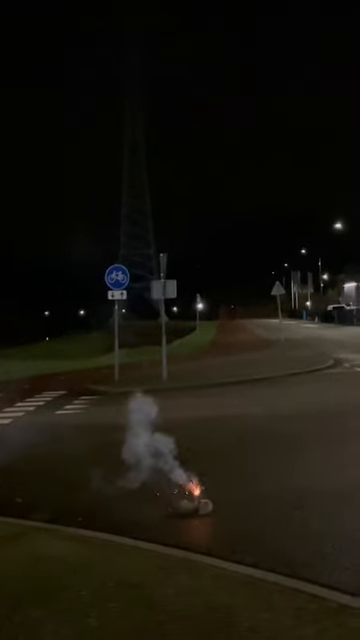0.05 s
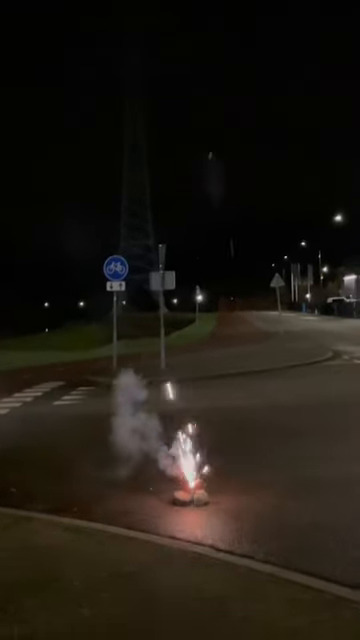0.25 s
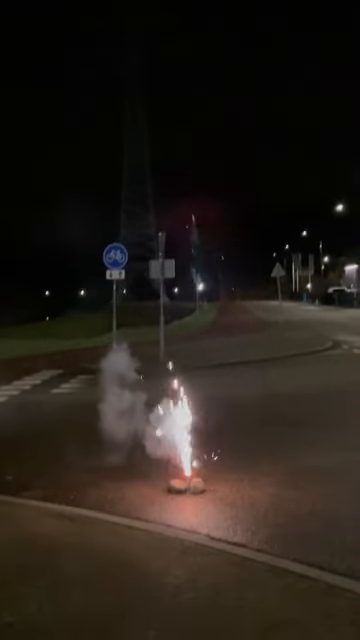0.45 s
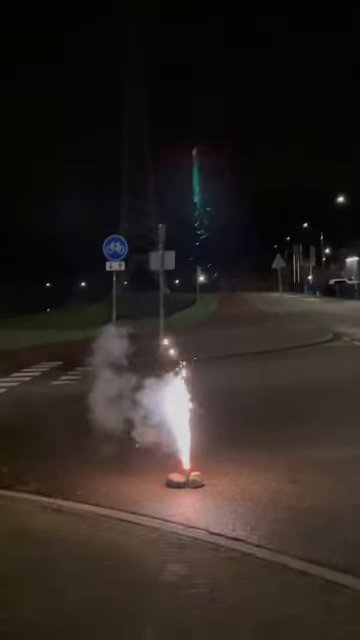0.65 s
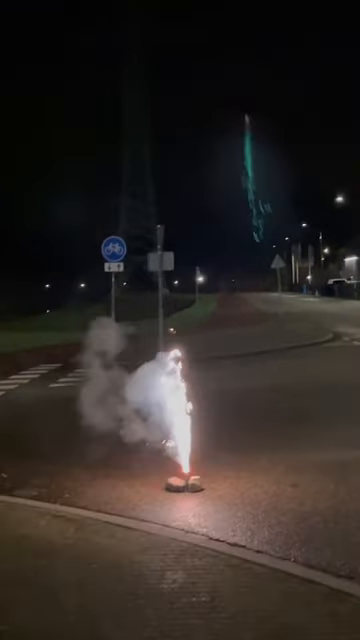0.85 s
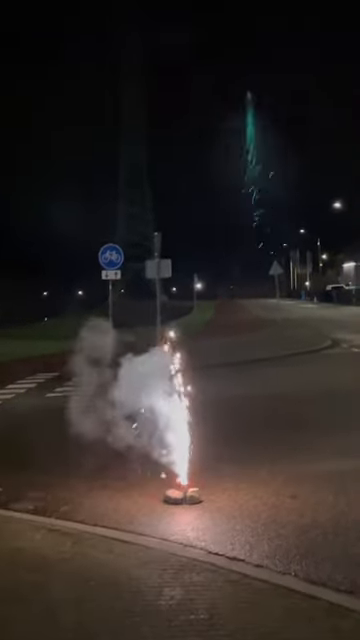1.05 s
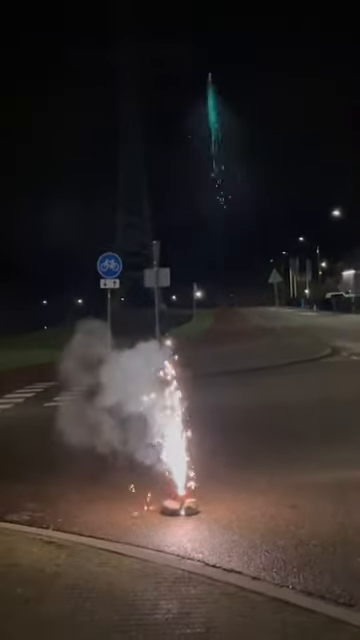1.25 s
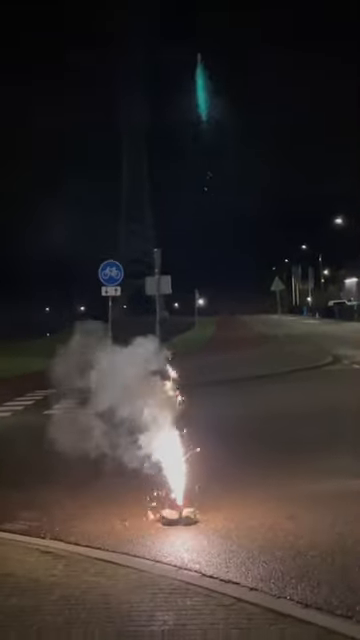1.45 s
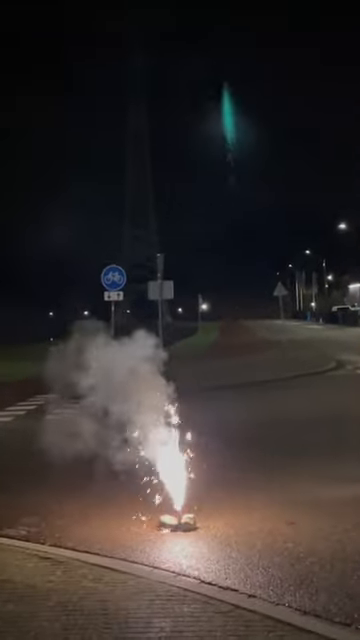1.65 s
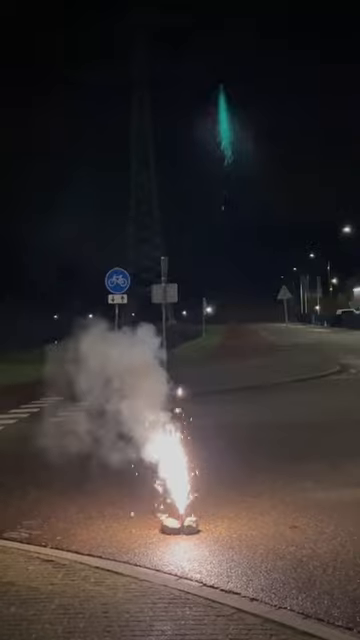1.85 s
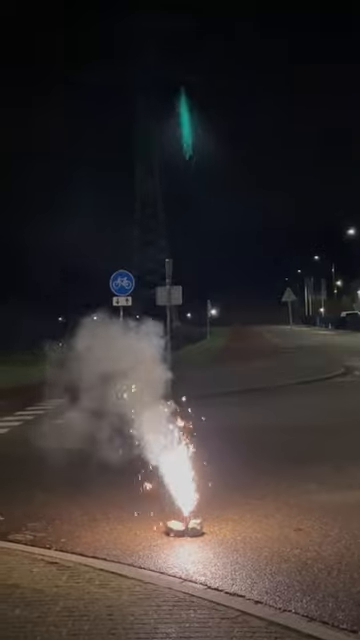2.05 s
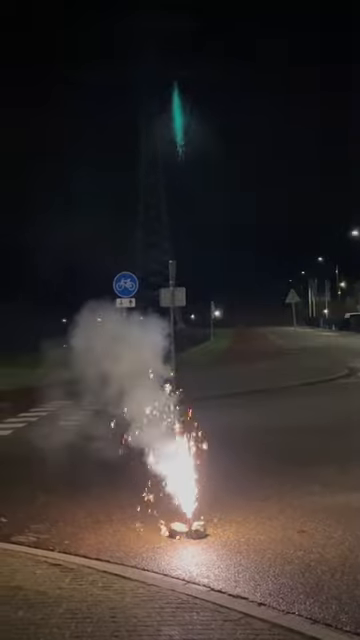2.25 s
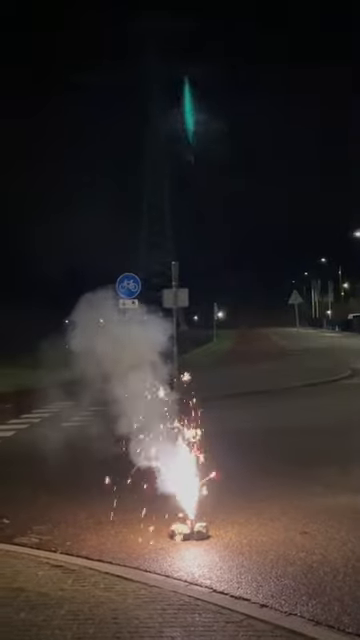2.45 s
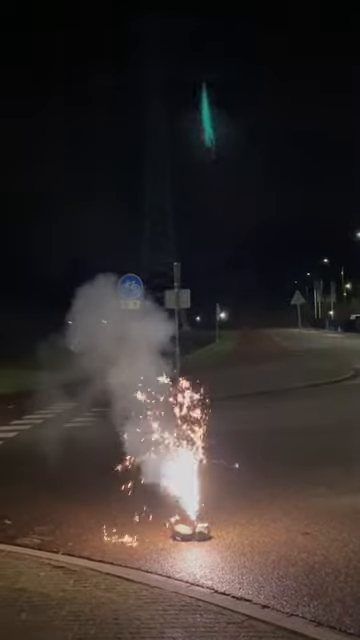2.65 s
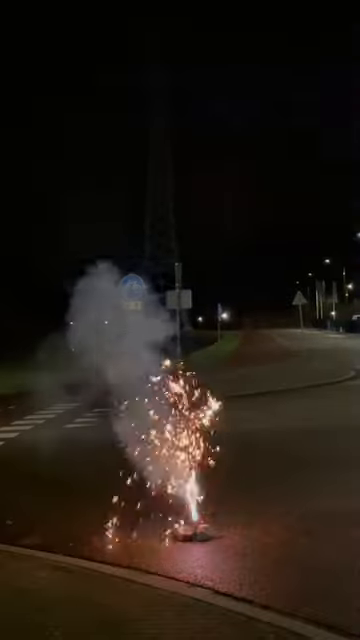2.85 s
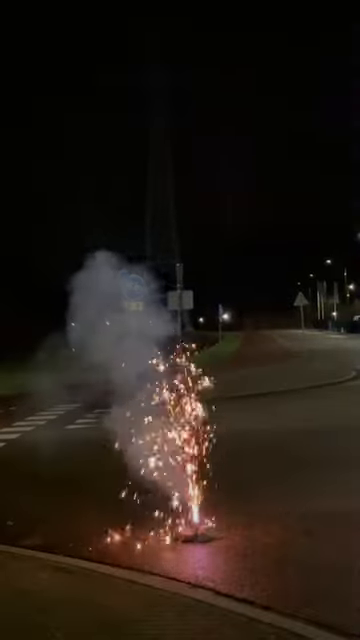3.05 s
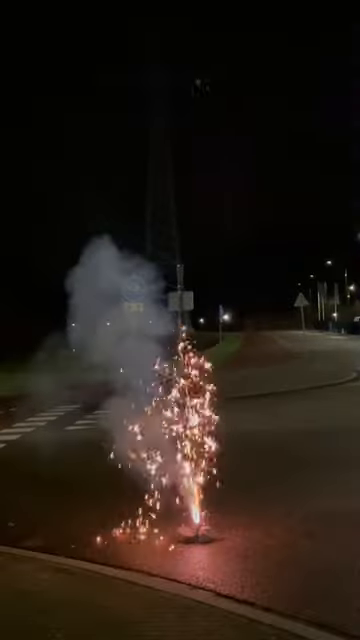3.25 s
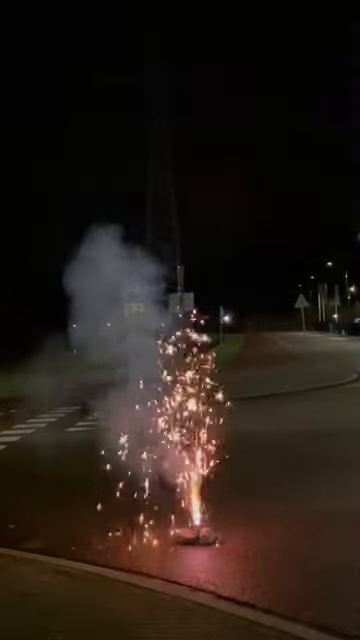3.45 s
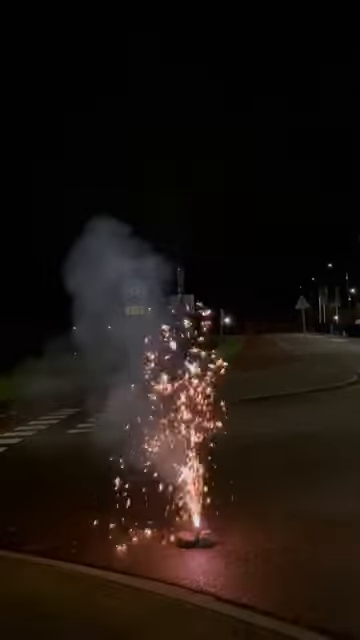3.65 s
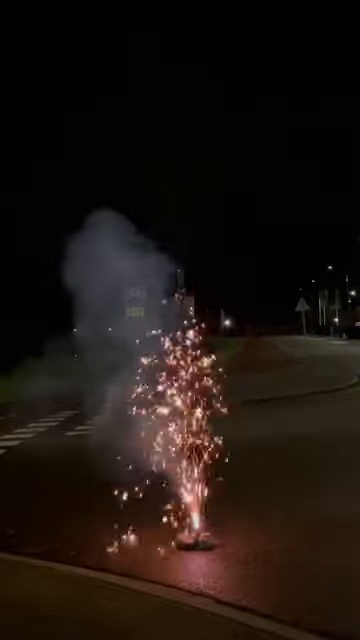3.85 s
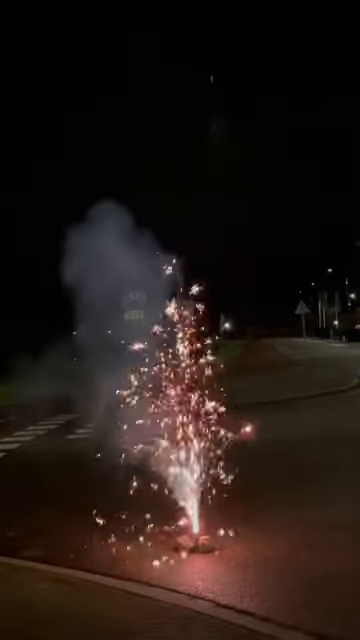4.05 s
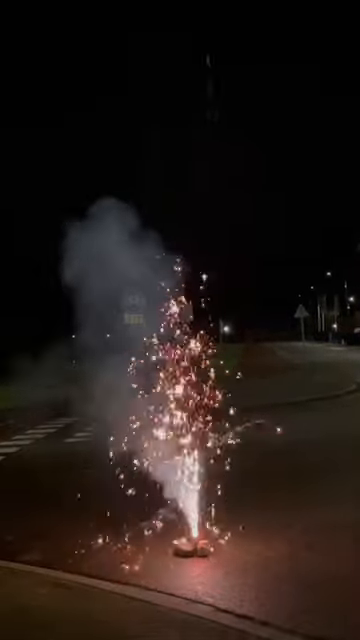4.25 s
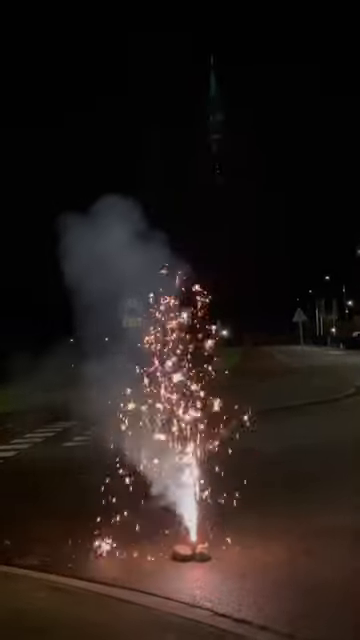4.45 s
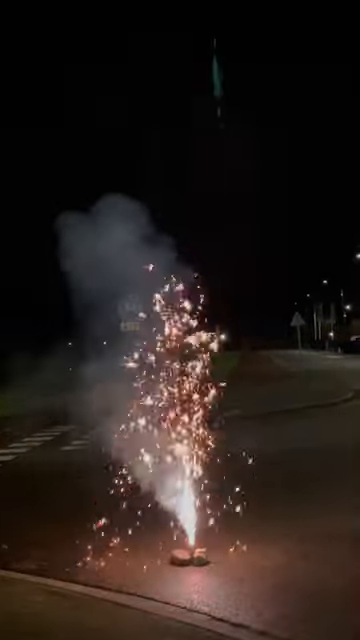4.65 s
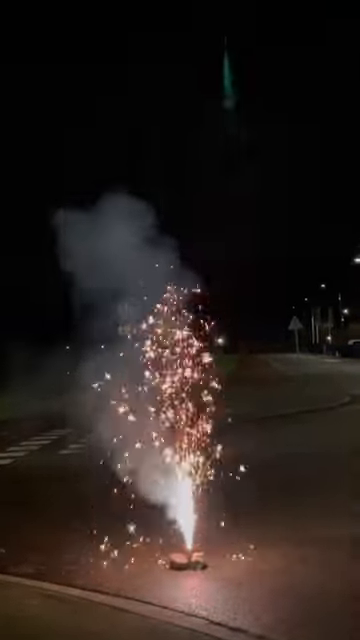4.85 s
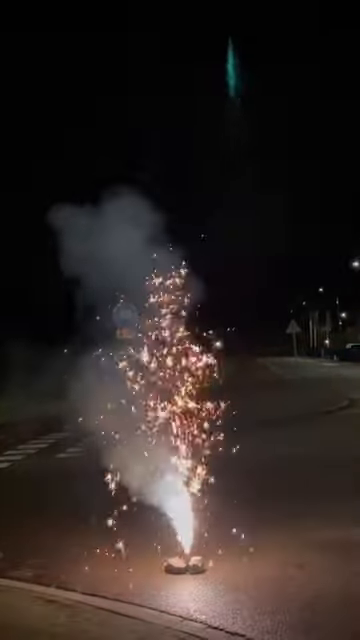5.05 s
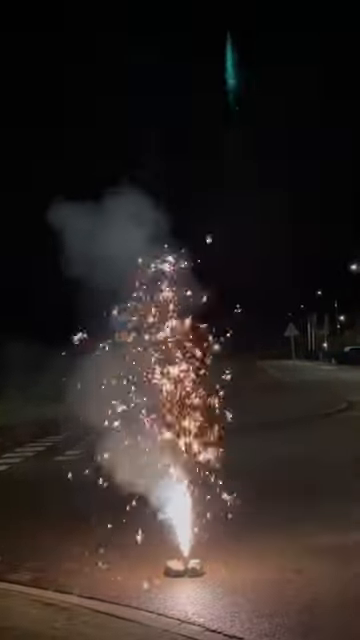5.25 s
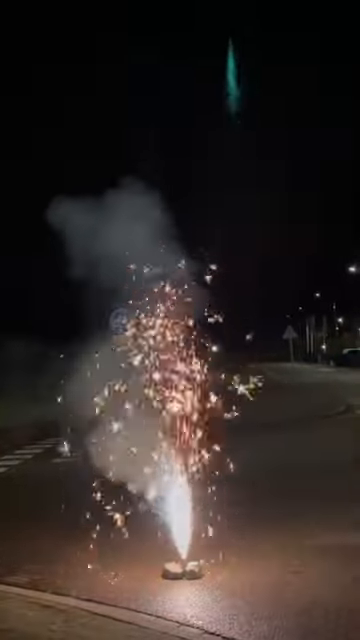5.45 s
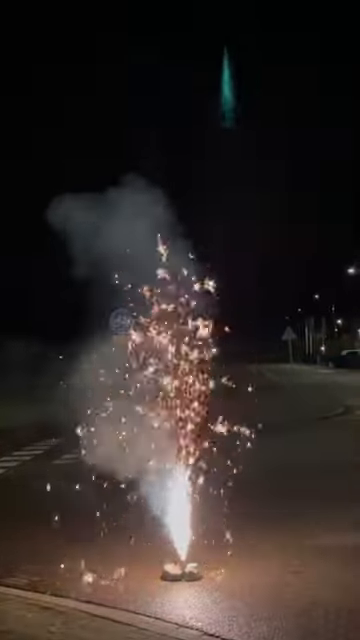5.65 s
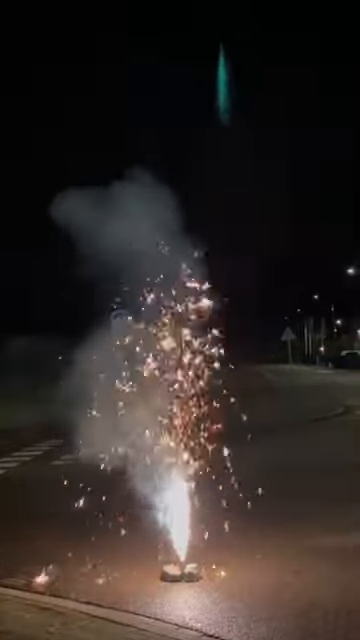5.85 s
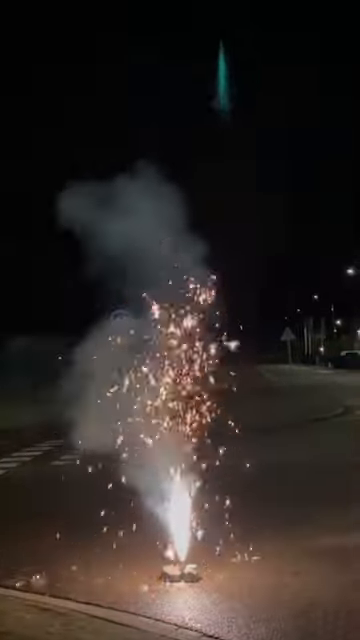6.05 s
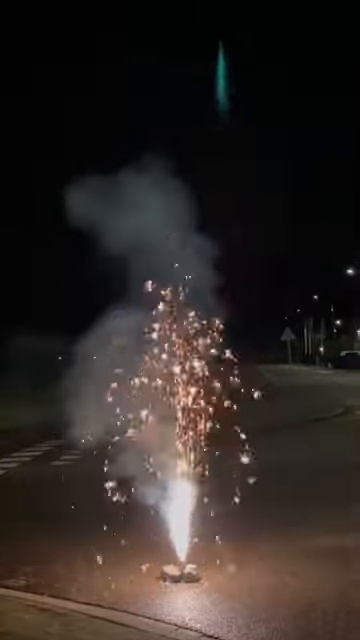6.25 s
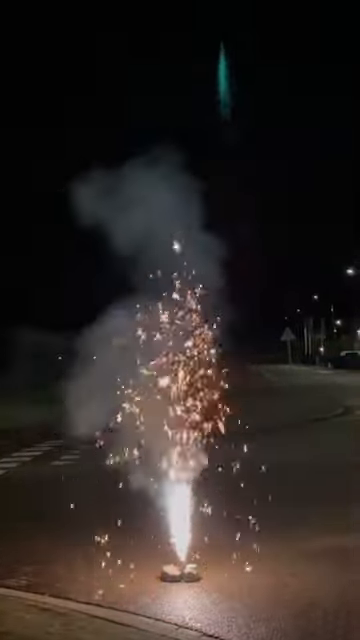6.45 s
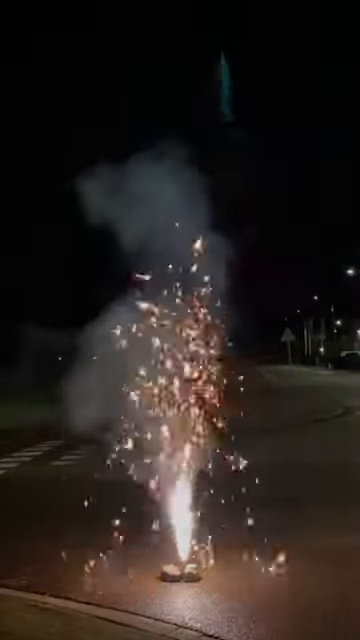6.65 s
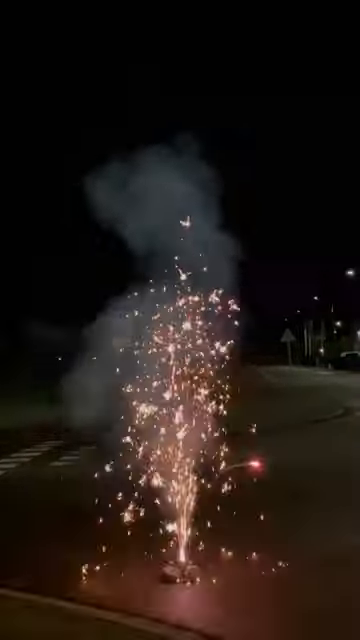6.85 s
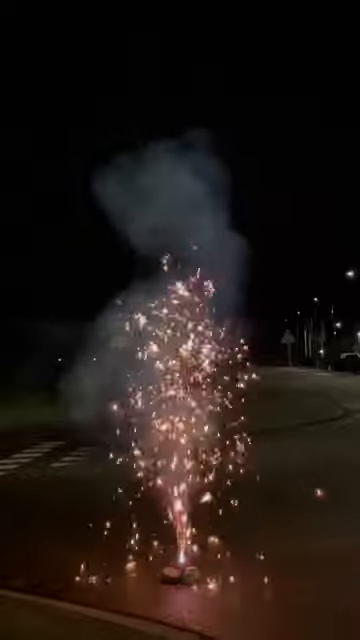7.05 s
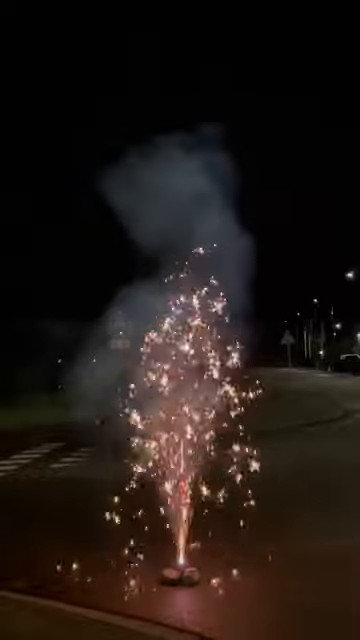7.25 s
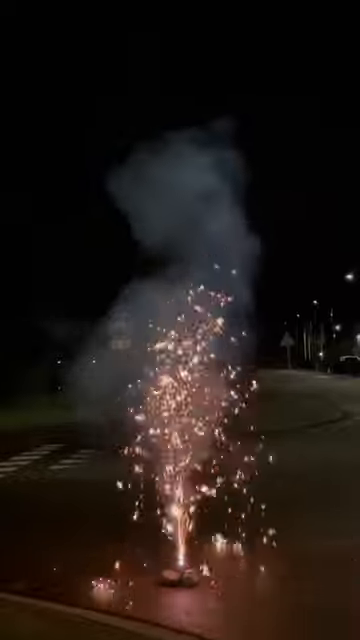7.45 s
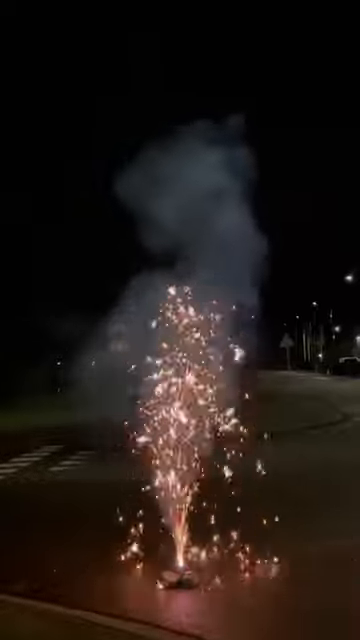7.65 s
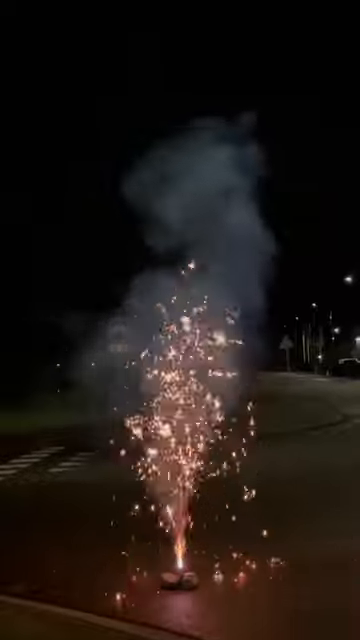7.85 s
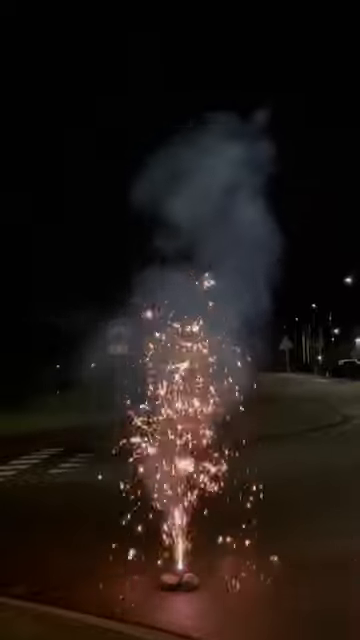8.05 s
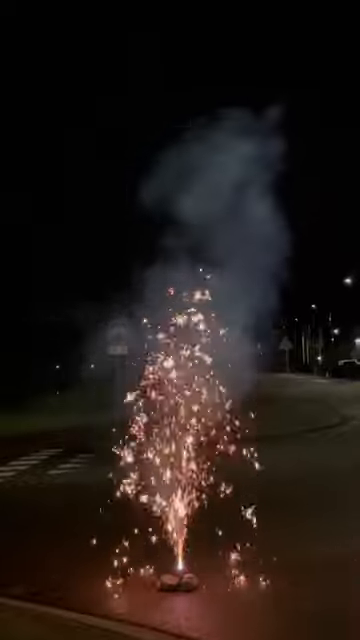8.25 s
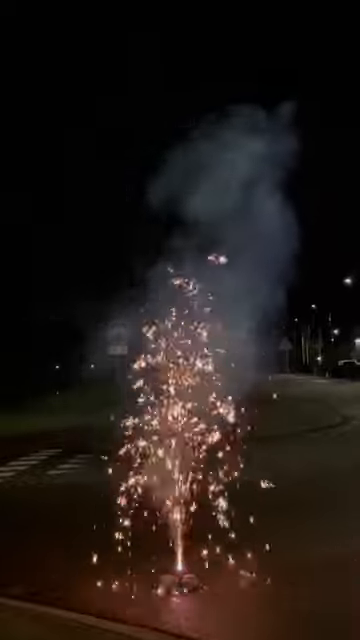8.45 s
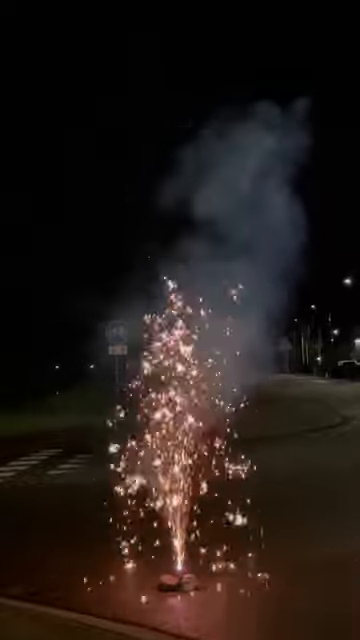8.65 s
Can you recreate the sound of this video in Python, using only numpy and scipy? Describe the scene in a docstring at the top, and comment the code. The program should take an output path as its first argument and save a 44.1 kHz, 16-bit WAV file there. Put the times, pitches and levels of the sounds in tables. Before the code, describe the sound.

A fountain firework hisses on a night street and gives two loud, shrill falling whistles, with distant bangs thumping behind.

```python
"""A fountain firework lights with a soft whoosh on a night street; its jet hisses and spits sparks.
Far bangs thump throughout, and far crackers go off at 1.2 s. At 1.6 s a whistle charge catches, falls
in pitch as its tube burns hollow, stumbles and blows out at 2.8 s, while a big far bang rolls away.
A second charge whistles from 5.3 to 6.6 s. Houses throw the whistles back, and the jet hisses on."""
import sys
import numpy as np
from scipy import signal
from scipy.fft import rfft, irfft, next_fast_len
from scipy.io import wavfile

SR = 44100
rng = np.random.default_rng(int(sys.argv[2]) if len(sys.argv) > 2 else 0)


def to_wav(s):
    """Save 16-bit WAV."""
    ch = np.atleast_2d(s).T  # columns
    pcm = np.round(np.clip(ch, -1, 1) * 32767)  # PCM
    wavfile.write(sys.argv[1], SR, pcm.astype(np.int16))


N = 383669
TIME = np.arange(N) / SR

# whistle charges: catch t/s, blow-out t/s, catch f/Hz, fraction flat before the catch
CHARGES = [(1.633, 2.794, 5222, .043), (5.293, 6.645, 5341, .027)]
# drive of each charge: t/s, level/dB
FIRST_DRIVE = [(0.85, -48), (1.052, -43.5), (1.292, -24), (1.352, -33.5), (1.598, -14), (1.652, -15),
               (1.748, -12), (2.1, -10.5), (2.432, -14), (2.684, -14.5), (2.77, -17)]
SECOND_DRIVE = [(4.82, -38.5), (5.0, -31.5), (5.03, -27.5), (5.05, -36), (5.082, -24), (5.152, -20.5),
                (5.282, -22), (5.308, -15), (5.832, -9.5), (6.246, -13.5), (6.498, -13.5), (6.63, -16)]
# stumbles of the tone: t/s, pitch drop/Hz, level drop/dB
TONE_STUMBLES = [(1.631, 800, 11), (1.737, 313, 2), (2.73, 60, 19), (5.241, 353, 6), (5.29, 50.3, 20),
                 (5.53, 130, -2), (5.739, 320, 4)]


def whistle(charge, drive, overtone_db, third_db, fizz_db, tone_db, stop_s,
            lock_db=-31, breathy_db=-35, full_drive_db=-14, stumble_s=.0022):
    """The tube first rings with jet noise, then locks into a clean tone amid a fizz of fast gas."""
    catch_s, end_s, catch_hz, flat = charge
    onset_s = drive[0][0]
    hz = bore_pitch(catch_s, catch_hz, flat)
    level_db, = curves(drive)
    locked = 1 / (1 + gain_of(1.06 * (lock_db - level_db)))
    unlocked = 1 - locked
    breathy = 1 / (1 + gain_of(3 * (level_db - breathy_db)))
    # overtones grow faster than the tone; the third weakens as pitch rises
    second_db = overtone_db + .73 * (level_db - full_drive_db)
    third_over_second_db = third_db - 5 * (3 * hz - 12500) / 1000
    jitter_hz = (12 + 35 * unlocked) * wander(133.6)
    waver_hz = 10 * wander(14)  # uneven burning
    hz = hz + jitter_hz + waver_hz
    for at_s, drop_hz, drop_db in TONE_STUMBLES:
        dip = np.exp(-((TIME - at_s) / stumble_s) ** 2)
        hz = hz - drop_hz * dip
        level_db = level_db - drop_db * dip
    carrier = phasor(hz)
    narrow = np.sqrt(unlocked * (1 - breathy)) * unlocked * noise_band(carrier, width_hz=130)
    wide = np.sqrt(breathy) * noise_band(carrier, width_hz=480)  # weak drive rings widely
    skirt = gain_of(-32) * noise_band(carrier, width_hz=260)
    fundamental = carrier.real * gain_of(.26 * wander(50))
    second = (carrier ** 2).real * gain_of(second_db + 1.2 * wander(45))
    third = (carrier ** 3).real * gain_of(second_db + third_over_second_db + 1.6 * wander(45))
    tone = gain_of(tone_db) * np.sqrt(2 * locked) * (fundamental + second + third)
    envelope = swell(onset_s, level_db, rise_s=.09, decay_s=stop_s, hold_s=end_s - onset_s)
    return envelope * (tone + narrow + wide + skirt) + gas_fizz(catch_s, end_s, fizz_db)


# the charge half chokes: t/s, half length/s, pitch drop/Hz
CHOKES = [(1.478, .07, 125.5), (1.723, 0.0211, 74.5), (2.73, 0.0487, 40.6), (5.215, 0.0228, 77.7),
          (5.646, 0.0836, 34.1), (6.602, .025, 60.2)]


def bore_pitch(catch_s, catch_hz, flat, growth_per_s=.233, fresh_bore_hz=5950):
    """Pitch is inverse to the steadily growing bore depth; it jumps up at the catch, sags at chokes."""
    depth = np.maximum(1 + growth_per_s * (TIME - catch_s), .5)
    bore_hz = catch_hz * (1 - flat * (TIME < catch_s)) / depth
    sag_hz = sum(drop_hz * np.exp(-((TIME - at_s) / half_s) ** 2) for at_s, half_s, drop_hz in CHOKES)
    return np.minimum(bore_hz, fresh_bore_hz) - sag_hz


# gas hiss spectrum: f/Hz, density/dB
HISS_SPECTRUM = [(1500, -16.5), (2200, -12), (2650, -2), (4300, 1), (5000, -2.5), (6600, -16.5),
                 (7400, -6.5), (8200, -5), (9000, -8.5), (10700, -16.5), (12600, -14), (14400, -20.5),
                 (15800, -35.5)]


def gas_fizz(catch_s, end_s, db, fade_db_per_s=3):
    """Fast gas fizzes from catch to blow-out, slowly weakening."""
    envelope = swell(catch_s, db, rise_s=.04, decay_s=.027, hold_s=end_s - catch_s)
    fade_db = fade_db_per_s * np.maximum(TIME - catch_s, 0)
    return envelope * gain_of(-fade_db) * treble(noise(HISS_SPECTRUM))


# jet burn: t/s, hiss level/dB, treble boost/dB
JET_BURN = [(.135, -66, 10.5), (.18, -48.5, 10), (.36, -47, 8.5), (.46, -53, 11), (.85, -48.5, 6),
            (1.45, -52.5, 8), (1.78, -43.5, 7.5), (2.3, -46.5, -3), (3.1, -48.5, -2.5), (3.6, -43, -4),
            (3.95, -43, -2), (4.0, -41, 6), (4.45, -40, 6), (4.85, -39.5, 0), (5.25, -40, 3.5),
            (6.0, -42.5, 2), (8.7, -44, 0)]
# low roar spectrum: f/Hz, density/dB
ROAR_SPECTRUM = [(100, -20), (300, -11.5), (550, -5), (830, 0), (1300, -7.5), (2000, -13), (4000, -48)]


def fountain_jet(sparks_per_s=1100, spark_db=-10, spread_db=3, flutter_db=.34, flicker_db=1.6):
    """Gas hiss with tiny spark cracks, over a low roar; hot white charges burn brighter."""
    hiss_db, boost_db = curves(JET_BURN)
    sizes = gain_of(spread_db * np.minimum(rng.exponential(1, N), 5))
    signs = rng.choice([-1, 1], N)
    sparks = unit_rms(sizes * signs * (rng.random(N) < sparks_per_s / SR))
    hiss = coloured(rng.standard_normal((2, N)) + gain_of(spark_db) * sparks, HISS_SPECTRUM)
    treble_gain = gain_of(boost_db + flicker_db * wander(14))
    hiss = hiss + (treble_gain - 1) * treble(hiss)
    roar_db = -51 + .32 * (hiss_db + 43)  # follows the hiss only a little
    roar = gain_of(roar_db) * noise(ROAR_SPECTRUM)
    return gain_of(flutter_db * wander(25)) * (gain_of(hiss_db) * hiss + roar)


# tube spits: t/s, level/dB, rise/s, decay/s
SPIT_PUFFS = [(.506, -41, .0005, .002), (2.729, -20, .006, .014), (4.452, -20, .0002, .0006),
              (6.606, -29.5, .003, .005)]
# spit spectrum: f/Hz, density/dB
SPIT_SPECTRUM = [(500, -6.5), (2200, -17.5), (3600, 9), (4600, 12.5), (6000, -10), (9000, -1), (13500, -14),
                 (15800, -18)]


def spits():
    """The tube spits short, bright puffs of turbulence."""
    return bursts(SPIT_PUFFS, SPIT_SPECTRUM)


# tube resonances: start t/s, end t/s, f/Hz, width/Hz, level/dB
TUBE_RESONANCES = [(.2, 1.15, 5290, 704, -53), (3.977, 5.2, 8980, 645, -50), (6.66, 8.66, 4030, 130, -61),
                   (6.66, 8.7, 7860, 410, -50)]


def tube_rings(drift=.011, waver_db=2, edge_s=.02):
    """Burning tubes ring faintly in their own jet, drifting with gas temperature, never locking."""
    pitch_ratio = 1 + drift * wander(4.1)
    waver = gain_of(waver_db * wander(11))
    rings = np.zeros(N)
    for start_s, end_s, hz, width_hz, db in TUBE_RESONANCES:
        band = noise_band(phasor(hz * pitch_ratio), width_hz)
        rings += band * swell(start_s, db, edge_s, edge_s, hold_s=end_s - start_s)
    return waver * rings


# ignition envelope: t/s, level/dB, rise/s, decay/s, hold/s
IGNITION_SWELL = (0.36, -52.5, 0.2, 0.17, 0.22)
# whoosh spectrum: f/Hz, density/dB
WHOOSH_SPECTRUM = [(60, -14), (250, 6), (450, 0), (900, -21), (2500, -30)]


def ignition():
    """The fountain lights with a soft whoosh."""
    return swell(*IGNITION_SWELL) * noise(WHOOSH_SPECTRUM)


# wall reflections: delay/s, level/dB
WALLS = [(.013, -25.5), (0.025, -30.5), (.054, -21.5), (.083, -21.5)]


def street_echo(x, tail_db=-22, t60_s=.64, treble_t60_s=.26, taps_per_s=2000, build_s=.093):
    """Single wall echoes and a thin scattered tail whose treble dies first."""
    build_up = np.minimum(np.arange(SR) / SR / build_s, 1)
    taps = rng.standard_normal((2, SR)) * (rng.random((2, SR)) < taps_per_s / SR) * build_up
    taps = taps + .5 * taps[::-1]  # partly shared by left and right
    hz, frame_s, spectra = signal.stft(taps, SR, nperseg=256)
    band_t60_s = at_hz([(4000, t60_s), (12000, treble_t60_s)], hz)[:, None]
    response = signal.istft(spectra * gain_of(-60 * frame_s / band_t60_s), SR, nperseg=256)[1]
    response *= gain_of(tail_db) / np.linalg.norm(response[0])
    for delay_s, db in WALLS:
        response[:, round(delay_s * SR)] += gain_of(db)
    return signal.fftconvolve(x, response, axes=1)[:, :N]


# far bangs: t/s, pre-filter level/dB, decay/s, cutoff f/Hz
BANGS = [(.02, -48, 0.11, 250), (.84, -39, 0.037, 84), (2.681, -31.5, 0.067, 189.4), (5.8, -44.5, .3, 220),
         (6.14, -35, .028, 100), (6.43, -31.5, 0.036, 65)]
# echoes off ever farther houses: delay/s, pre-filter level/dB, rise/s, decay/s, cutoff f/Hz
BANG_ECHOES = [(.147, -30.5, 0.034, 0.19, 560), (.37, -32, 0.086, 0.14, 320), (.6, -42, .1, .5, 333),
               (1.5, -51.5, 0.36, 1, 282)]
# bang spectrum: f/Hz, density/dB
BANG_SPECTRUM = [(35, -13.5), (70, 2.5), (120, 1), (175, 5.5), (250, -8), (370, -3.5), (550, -14),
                 (900, -28)]


def far_bangs(thump_rise_s=.0069, lumps_db=4.5):
    """Far bangs arrive as bass thumps; the biggest rolls on in lumpy echoes."""
    rumble = noise(BANG_SPECTRUM)

    def dull(cutoff_hz):
        lowpass = signal.butter(2, cutoff_hz, fs=SR, output="sos")
        return signal.sosfilt(lowpass, np.roll(rumble, rng.integers(N), axis=1))

    thumps = sum(swell(at_s, db, thump_rise_s, decay_s) * dull(cutoff_hz)
                 for at_s, db, decay_s, cutoff_hz in BANGS)
    biggest_s = max(BANGS, key=lambda row: row[1])[0]
    echoes = sum(swell(biggest_s + delay_s, db, rise_s, decay_s) * dull(cutoff_hz)
                 for delay_s, db, rise_s, decay_s, cutoff_hz in BANG_ECHOES)
    return thumps + gain_of(lumps_db * wander(16)) * echoes


# far crackers: t/s, level/dB
CRACKER_POPS = [(1.168, -40), (1.18, -40), (1.189, -39.5), (1.2, -41)]
# cracker spectrum: f/Hz, density/dB
CRACKER_SPECTRUM = [(300, -9), (750, -5), (1600, -1), (2200, -12), (3500, -17), (7000, -33)]


def far_crackers(rise_s=.0048, decay_s=.01):
    """A quick run of dull pops from distant crackers."""
    return bursts([(at_s, db, rise_s, decay_s) for at_s, db in CRACKER_POPS], CRACKER_SPECTRUM)


# distant night spectrum: f/Hz, density/dB
NIGHT_SPECTRUM = [(15, -54.5), (25, -1), (64, -3.5), (191, -9), (373, -11.5), (427, -13), (543, -12.5),
                  (588, -22.5), (2780, -47), (6040, -37), (15000, -61)]


def distant_night(db=-52.5):
    """Steady low background rumble."""
    return gain_of(db) * noise(NIGHT_SPECTRUM)


# left-right likeness: f/Hz, correlation
STEREO_CORRELATION = [(50, 0.31), (130, 0.96), (300, 0.68), (700, 0.88), (3000, 0.85), (7000, 1),
                      (15000, 0.98)]


def coloured(pair, spectrum):
    """Two unrelated signals become partly shared stereo with this spectrum, rms 1."""
    shared = lambda f: np.clip(at_hz(STEREO_CORRELATION, f), 0, 1)
    mid = filtered(pair[0], lambda f: gain_of(at_hz(spectrum, f)) * np.sqrt(1 + shared(f)))
    side = filtered(pair[1], lambda f: gain_of(at_hz(spectrum, f)) * np.sqrt(1 - shared(f)))
    return unit_rms(np.array([mid + side, mid - side]))


def noise(spectrum):
    """Stereo turbulence with this spectrum."""
    return coloured(rng.standard_normal((2, N)), spectrum)


def bursts(rows, spectrum):
    """Puffs of turbulence, summed in power."""
    return np.sqrt(sum(swell(*row) ** 2 for row in rows)) * noise(spectrum)


def phasor(hz):
    """Complex oscillator following a pitch curve."""
    return np.exp(2j * np.pi * np.cumsum(hz) / SR)


def noise_band(carrier, width_hz):
    """Turbulence ringing in a tube: a fuzzy band around the carrier."""
    return ((wander(width_hz) + 1j * wander(width_hz)) * carrier).real


def wander(hz):
    """Random motion of rms 1, up to about hz."""
    return unit_rms(filtered(rng.standard_normal(N), lambda f: 1 / (1 + (f / hz) ** 2)))


def swell(peak_s, db, rise_s, decay_s, hold_s=0):
    """Exponential rise to peak_s, hold, exponential decay."""
    before_s = np.maximum(peak_s - TIME, 0)
    after_s = np.maximum(TIME - peak_s - hold_s, 0)
    return gain_of(db) * np.exp(-before_s / rise_s - after_s / decay_s)


def treble(x, edge_hz=8600):
    """Steep high-pass."""
    return filtered(x, lambda f: 1 / (1 + (edge_hz / (f + 1)) ** 5))


def filtered(x, gain):
    """Applies a gain given as a function of frequency."""
    size = next_fast_len(N + 8192)
    return irfft(rfft(x, size) * gain(np.fft.rfftfreq(size, 1 / SR)), size)[..., :N]


def curves(rows):
    """Each column of a timed table, per sample."""
    times_s, *columns = np.transpose(rows)
    return [np.interp(TIME, times_s, column) for column in columns]


def at_hz(points, hz):
    """Interpolates on a log-frequency axis."""
    f, value = np.transpose(points)
    return np.interp(np.log(hz + 1), np.log(f + 1), value)


def gain_of(db):
    """Decibels to amplitude."""
    return 10 ** (np.asarray(db) / 20)


def unit_rms(x):
    """Scales to rms 1."""
    return x / np.sqrt(np.mean(x ** 2) + 1e-20)


def scene():
    """The firework and its echoes over the distant night."""
    first = whistle(CHARGES[0], FIRST_DRIVE, overtone_db=-23.5, third_db=-3.5,
                    fizz_db=-37.5, tone_db=0, stop_s=.005)
    second = whistle(CHARGES[1], SECOND_DRIVE, overtone_db=-14.5, third_db=-4,
                     fizz_db=-29, tone_db=.55, stop_s=.011)
    near = first + second + fountain_jet() + ignition() + tube_rings() + spits()
    far = far_crackers() + far_bangs() + distant_night()
    return near + street_echo(near) + far


# microphone balance: f/Hz, left minus right level/dB
MIC_BALANCE = [(110, .5), (280, 1), (700, -6), (2400, -4), (4500, -2.8), (5200, -.7), (8100, -.7),
               (10500, 1), (13000, 4.5)]


def record(dry, left_lag_s=24e-6, band_limit_hz=15750):
    """Two band-limited microphones of unequal colour; the left hears all but the treble slightly later."""
    lag_s = lambda f: left_lag_s / (1 + (f / 8000) ** 6)
    mics = filtered(dry, lambda f: gain_of(np.outer([.5, -.5], at_hz(MIC_BALANCE, f))))
    mics = filtered(mics, lambda f: np.exp(2j * np.pi * np.outer([-.5, .5], f * lag_s(f))))
    lowpass = signal.firwin(511, band_limit_hz, window=("kaiser", 9), fs=SR)
    return signal.oaconvolve(mics, lowpass[None], "same")


dry = scene()
out = record(dry)
to_wav(out)
```